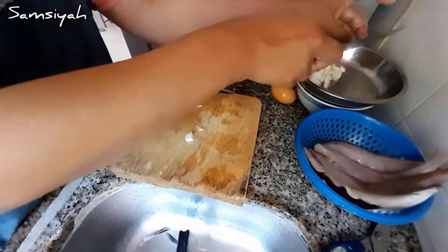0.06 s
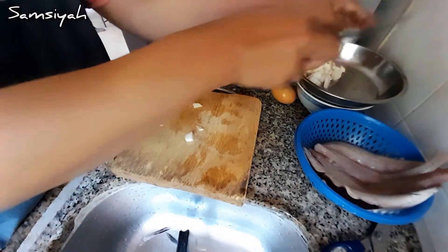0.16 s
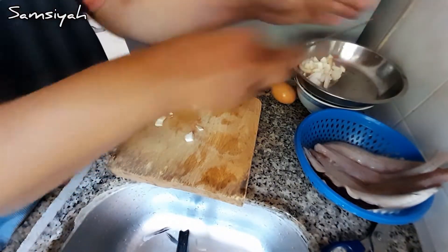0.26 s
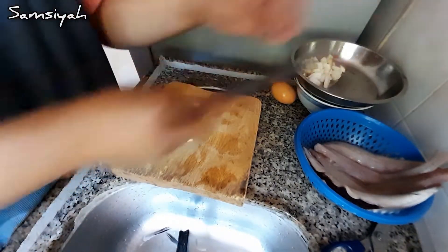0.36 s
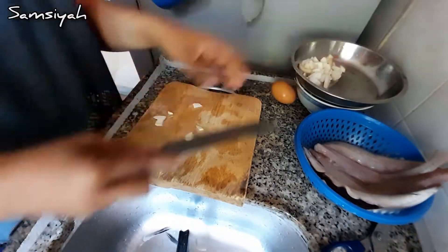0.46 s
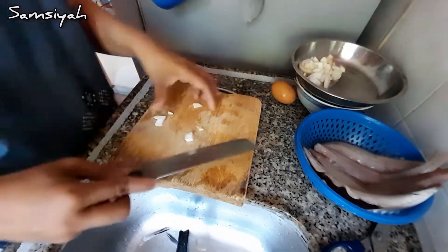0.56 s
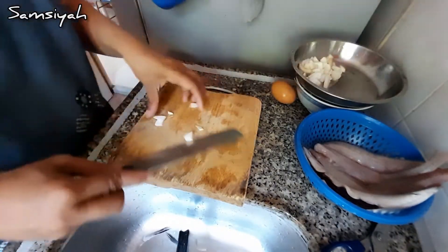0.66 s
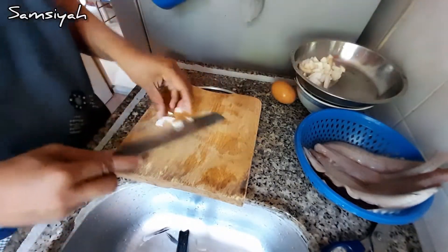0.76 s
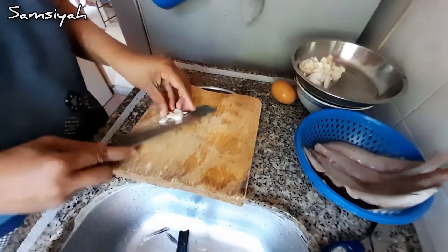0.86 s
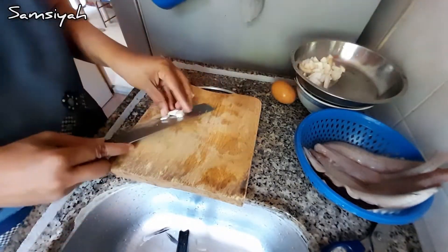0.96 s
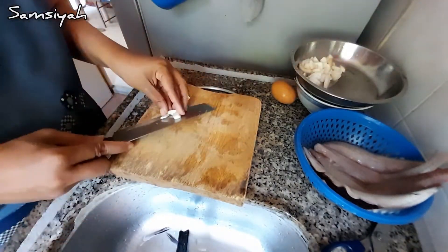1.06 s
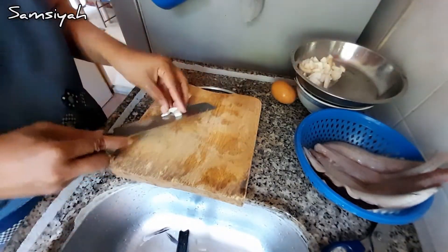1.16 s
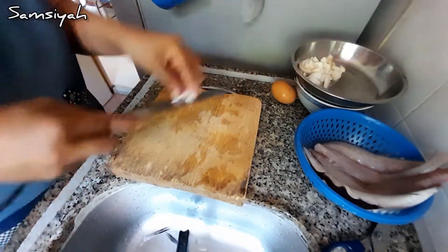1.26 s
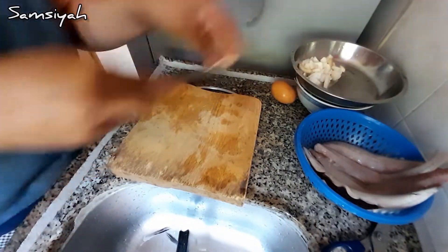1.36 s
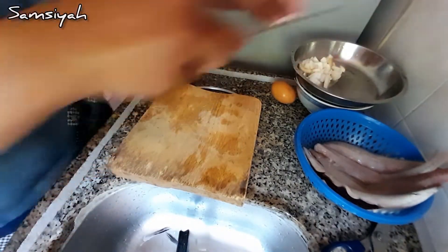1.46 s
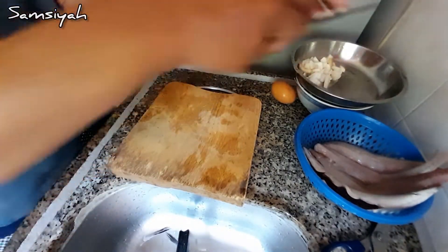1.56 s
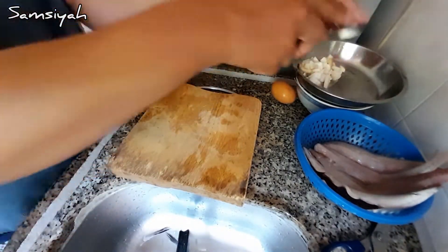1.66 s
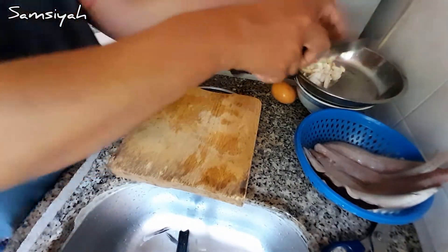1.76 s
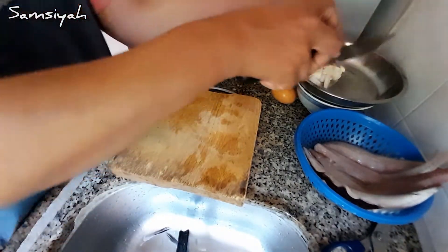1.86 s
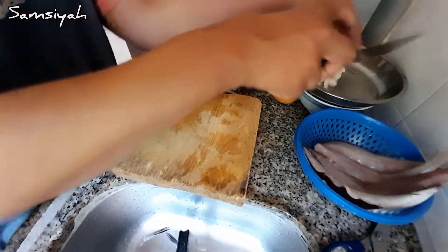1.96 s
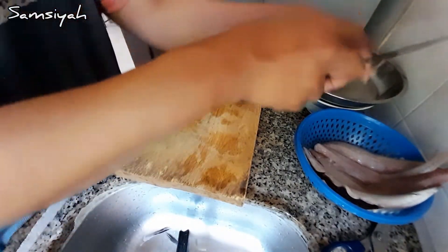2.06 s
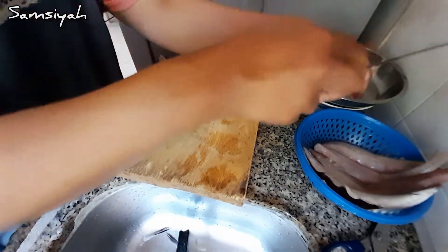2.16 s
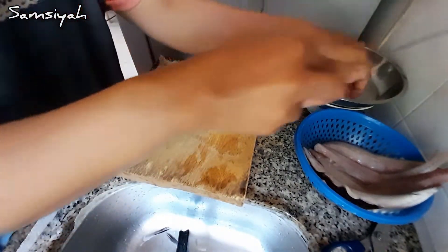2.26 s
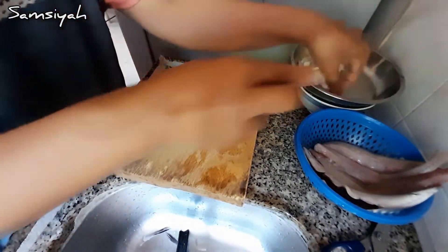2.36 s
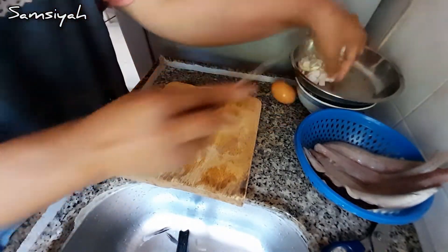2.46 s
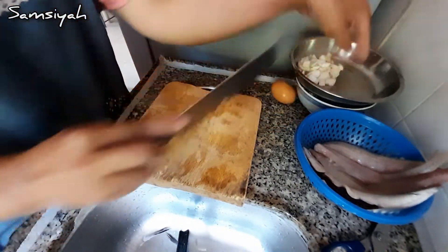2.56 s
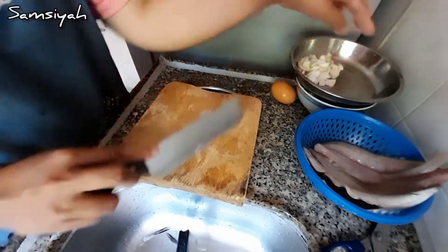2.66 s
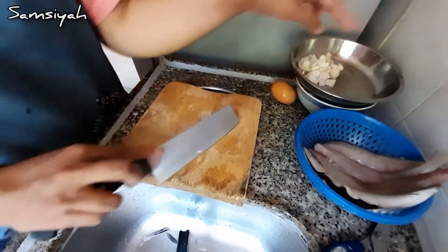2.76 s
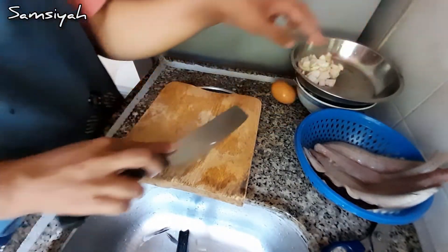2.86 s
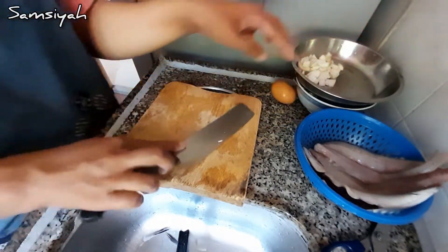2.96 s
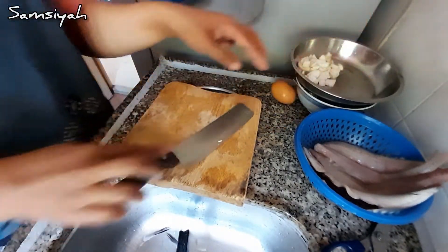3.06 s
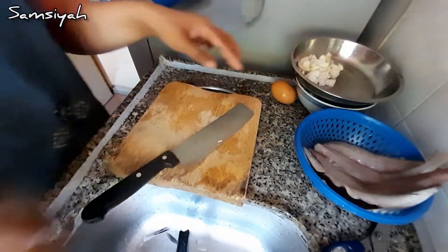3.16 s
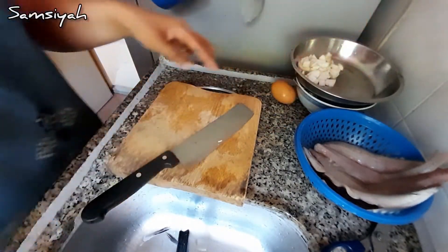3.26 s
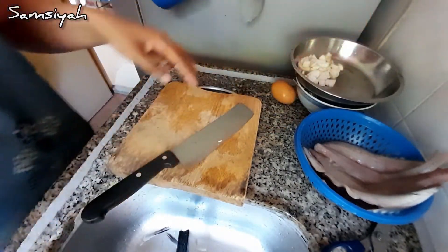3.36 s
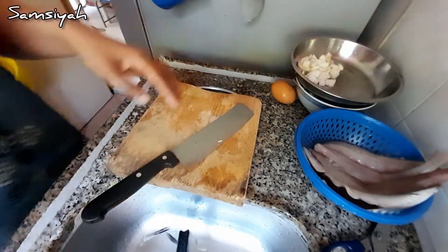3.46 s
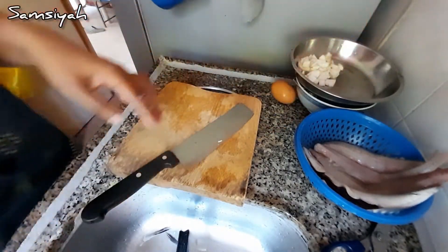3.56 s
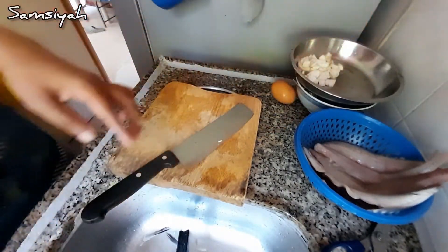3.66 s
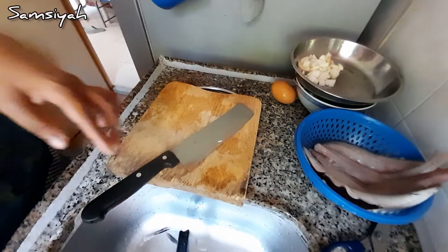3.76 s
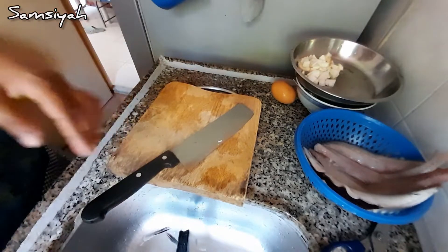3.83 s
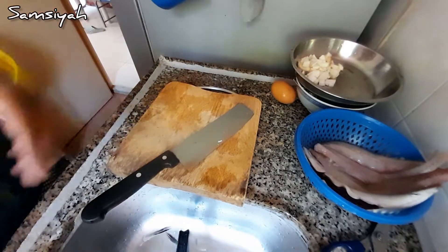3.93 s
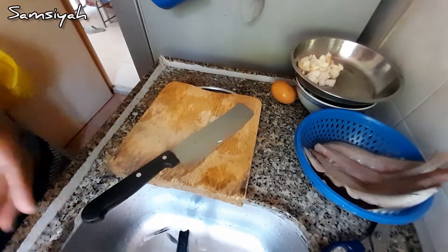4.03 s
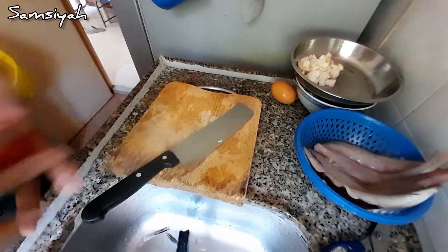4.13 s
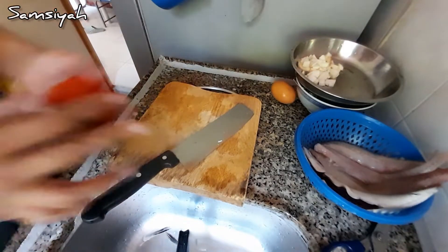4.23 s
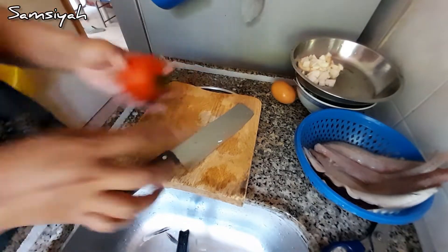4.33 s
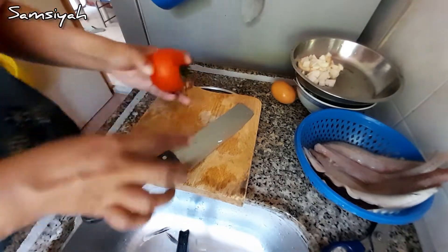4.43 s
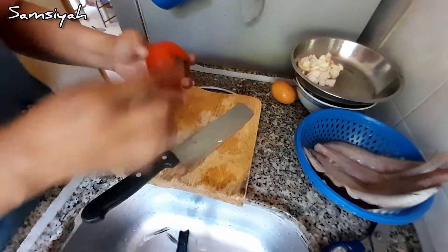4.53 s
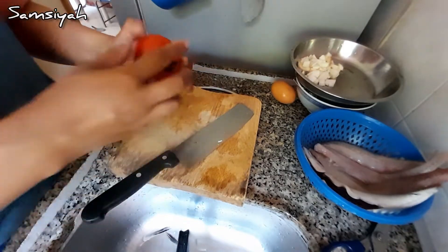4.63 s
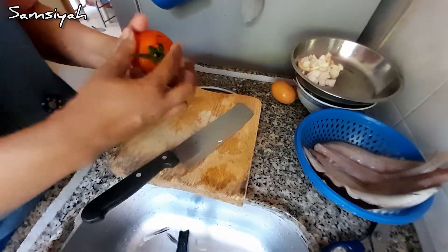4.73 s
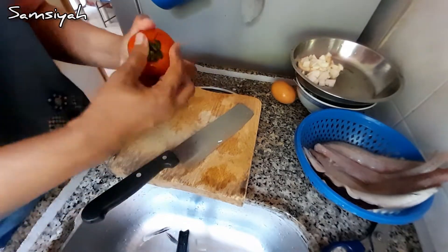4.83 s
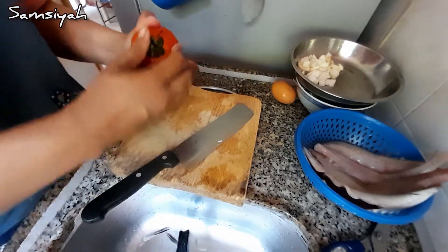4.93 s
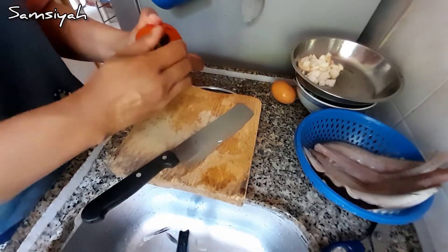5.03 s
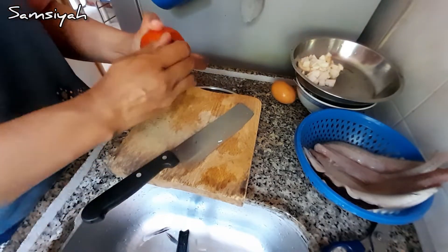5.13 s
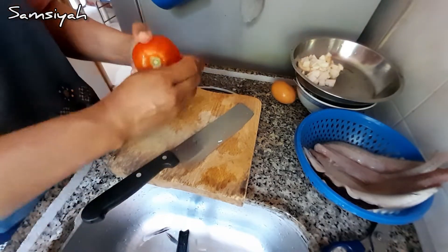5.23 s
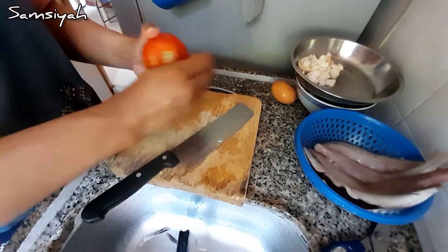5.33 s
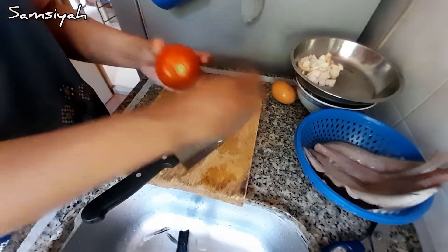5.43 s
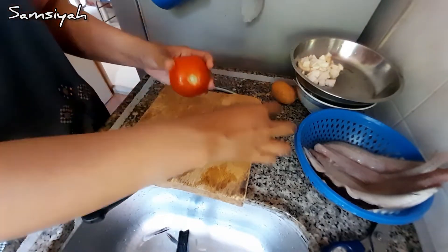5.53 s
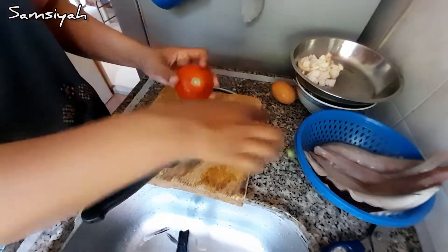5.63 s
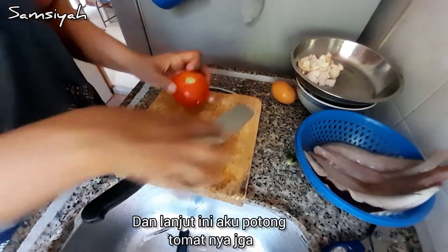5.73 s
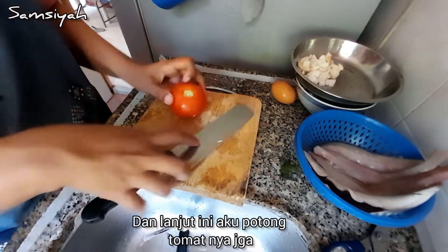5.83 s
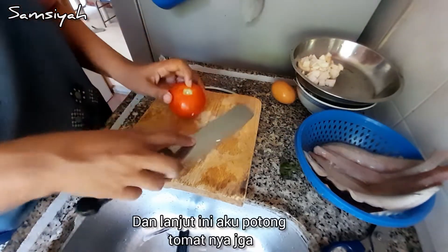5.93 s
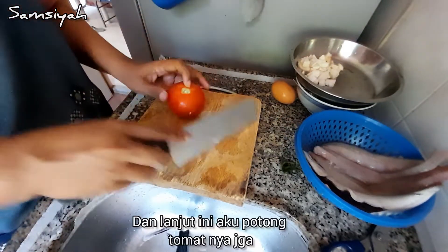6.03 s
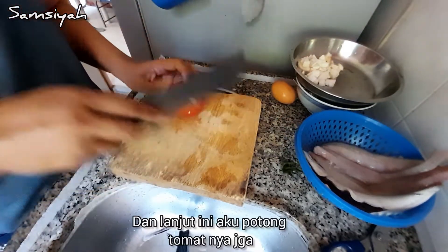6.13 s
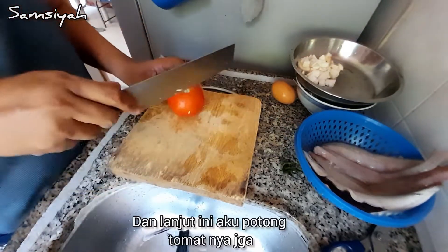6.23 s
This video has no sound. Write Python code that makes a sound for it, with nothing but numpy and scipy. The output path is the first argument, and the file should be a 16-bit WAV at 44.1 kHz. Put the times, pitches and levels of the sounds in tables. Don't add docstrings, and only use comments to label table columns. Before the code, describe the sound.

Close in a small, hard-walled kitchen, a knife edge taps a wooden board and scrapes thinly across it. Sleeves and hands rustle with dull bowl bumps. A loud flat knock shakes the counter, then the blade is laid down with a metallic clatter. Quieter handling follows, a crisp stalk snap, small ticks and soft thuds, with faint bird whistles and a low motor hum at the end.

```python
import sys
import numpy as np
from scipy import signal
from scipy.fft import rfft, irfft, next_fast_len
from scipy.io import wavfile
from scipy.ndimage import uniform_filter1d, map_coordinates

SR = 44100
rng = np.random.default_rng(int(sys.argv[2]) if len(sys.argv) > 2 else 0)


def ratio(d):
    e = np.asarray(d, float) / 20
    return 10 ** e


def dump_mix(stems):
    frames = np.atleast_2d(stems).T
    limited = np.clip(frames, -1, 1)
    pcm = np.round(limited * 32767).astype(np.int16)
    wavfile.write(sys.argv[1], SR, pcm)


N = 277389
TIME = np.arange(N) / SR


def rms_one(x):
    return x / np.sqrt(np.mean(x ** 2) + 1e-20)


def in_time(rows):
    s, *columns = np.transpose(rows)
    return [np.interp(TIME, s, c) for c in columns]


def at_hz(points, hz):
    points = np.array(points)
    return np.interp(np.log(hz), np.log(points[:, 0]), points[:, 1])


def drift(rate):
    r = np.exp(-80 * np.pi * rate / SR)
    chance = rng.standard_normal(N // 40 + 2002)
    slow = signal.lfilter([1], [1, -2 * r, r * r], chance)[2000:]
    return np.interp(np.arange(N) / 40, np.arange(len(slow)), rms_one(slow))


def pan(db):
    return ratio(np.array([db / 2, -db / 2])).reshape(2, -1)


def dull(x, hz):
    return signal.sosfilt(signal.butter(2, min(hz, .45 * SR), fs=SR, output="sos"), x)


def above(x, hz, order=2):
    return signal.sosfilt(signal.butter(order, hz, "high", fs=SR, output="sos"), x)


def between(x, low_hz, high_hz):
    return signal.sosfilt(signal.butter(2, [low_hz, high_hz], "band", fs=SR, output="sos"), x)


def resonate(x, hz, width_hz):
    r = np.exp(-np.pi * width_hz / SR)
    feedback = [1, -2 * r * np.cos(2 * np.pi * hz / SR), r * r]
    return signal.lfilter([(1 - r * r) / 2, 0, (r * r - 1) / 2], feedback, x)


def blend(mid, side, alike):
    alike = np.clip(alike, -1, 1)
    return np.sqrt(1 + alike) * mid + np.sqrt(1 - alike) * side * [[1], [-1]]


def stereo_noise(alike):
    mid, side = rng.standard_normal((2, N))
    return blend(mid, side, alike) / np.sqrt(2)


# (frequency [Hz], left-right likeness [-1..1])
LIKENESS = [(60, 0.91), (180, 0.8), (550, 0.24), (1650, -0.15), (4970, -0.024), (15000, -0.65)]


def banded_noise(spectrum, low_hz, patchy_db, alike=None):
    out, edges = 0, low_hz * 2 ** np.arange(0, np.log2(.38 * SR / low_hz), 1 / 3)
    white = rng.standard_normal((2, 2, N))
    for k, (low, high) in enumerate(zip(edges, edges[1:])):
        mid, side = between(white[k % 2], low, high)
        hz = np.sqrt(low * high)
        like = at_hz(LIKENESS, hz) if alike is None else alike
        gain = ratio(at_hz(spectrum, hz) + patchy_db * drift(17.0))
        out = out + gain * blend(mid, side, like)
    return rms_one(out)


def swells(rows, roundness, rest_db):
    power = ratio(np.array(rest_db))[:, None] ** 2 + 0 * TIME
    for s, rise, fall, *peak_db in rows:
        away = np.where(TIME < s, (s - TIME) / rise, (TIME - s) / fall)
        power = power + ratio(np.array(peak_db)[:, None] - 20 * np.minimum(away, 10) ** roundness) ** 2
    return 10 * np.log10(power)


def ring(modes, length):
    hz, level_db, t60 = np.array(modes).T[:, :, None]
    t = np.arange(round(length * SR)) / SR
    luck = rng.normal(0, 1, (3, len(modes), 1))
    wide = np.minimum(hz / 2500, 1)
    turn = np.pi * (np.arange(len(modes)) % 2)[:, None] * (hz < 600)
    beat = 1 + .2 * wide * np.sin(2 * np.pi * hz * .012 * luck[1] * t + luck[2])
    ears = []
    for ear in range(2):
        decay = ratio(level_db + 0.95 * wide * luck[ear] - 60 * t / t60)
        phase = 2 * np.pi * hz * t + turn + ear * wide * (1.95 + 1.28 * luck[0])
        ears.append(np.sum(decay * beat * np.sin(phase), axis=0))
    return np.array(ears)


def burst(at_s, hz, width_hz, t60, alike):
    t = np.arange(round(.25 * SR)) / SR
    mid, side = rng.standard_normal((2, len(t)))
    noise = resonate(blend(mid, side, alike), hz, width_hz)
    return round(at_s * SR), rms_one(noise) / 2 * ratio(-60 * t / t60) * np.minimum(t / .0005, 1)


def add(out, start, piece):
    out[:, start:start + piece.shape[-1]] += piece[..., :N - start]


# (time [s], lower mode level [dB], lean toward upper mode [dB])
TRAFFIC = [(0, -54.5, -1), (.15, -56.5, 1), (.5, -59, 9.5), (.9, -56.5, 5), (1.1, -60, 2.5),
           (1.4, -57.5, 3.5), (1.8, -51, -2), (2.2, -56.5, 4), (2.5, -51.5, -5), (3.3, -56, 0.5),
           (3.55, -57.5, -3.5), (4.1, -54, 0.5), (4.6, -50.5, -9), (4.95, -50, 1.5), (5.25, -63, 4),
           (5.5, -54, 1), (6.29, -56.5, 6)]
# (frequency [Hz], width [Hz])
DRONE_MODES = [
    (113, 13),
    (153, 14.8),
]
# (frequency [Hz], level per Hz [dB])
AIR = [(190, -7), (344, -13), (430, -8), (919, -13.5), (3630, -22.5), (7340, -34), (10800, -38.5),
       (16000, -54.5)]


def room_air():
    air_db, murmur_rest_db, rumble_db = -53.5, -55.5, -67.5
    handling_db, linger_s = -0.5, 0.066
    lower_db, lean_db = in_time(TRAFFIC)
    lower_db = lower_db - 1.5
    upper_db = lower_db + lean_db
    handling = uniform_filter1d(ratio(effort()[1] + handling_db) ** 2, round(linger_s * SR))
    murmur_db = 10 * np.log10(ratio(murmur_rest_db) ** 2 + handling)
    air = banded_noise(AIR, low_hz=187.5, patchy_db=1.0)
    murmur = dull(air, hz=1300)
    out = ratio(air_db) * (air - murmur) + ratio(murmur_db - 0.9) * rms_one(murmur)
    for (hz, width_hz), level_db in zip(DRONE_MODES, (lower_db, upper_db)):
        once = resonate(stereo_noise(1.0), hz, width_hz * 1.38)
        twice = resonate(once, hz, width_hz * 1.38)
        out += ratio(level_db + 5.5) * rms_one(twice) * pan(-1.06)
    rumble = rms_one(between(stereo_noise(0.88), 36, 72))
    return out + ratio(rumble_db + 0.7 * (murmur_db - murmur_rest_db) + 1.3 * drift(1.0)) * rumble


# (peak time [s], rise [s], fall [s], bright level [dB], dull level [dB])
GESTURES = [(0.234, 0.19, 0.87, -59, -58.5), (0.575, 0.082, 0.45, -73, -50.5), (0.74, .17, 0.12, -43, -41),
            (0.885, 0.17, 0.048, -45.5, -46.5), (1.537, 0.15, 0.23, -51, -50),
            (1.836, 0.17, 0.16, -54, -52.5), (2.04, .15, 0.39, -66, -66), (2.205, 0.022, 0.074, -70, -50),
            (2.375, 0.19, 0.12, -50.5, -53.5), (2.645, 0.21, 0.069, -48.5, -51),
            (2.839, 0.27, 0.23, -47.5, -49.5), (3.03, 0.03, 0.12, -43.5, -39.5),
            (3.133, 0.2, 0.22, -52, -52), (3.906, .1, 0.11, -67.5, -64), (4.15, 0.092, 0.19, -50.5, -52),
            (4.615, 0.13, 0.39, -73.5, -66), (4.789, 0.079, 0.43, -68, -61), (5.054, 0.079, 0.11, -57, -70),
            (5.2, 0.047, 0.074, -47, -51.5), (5.348, .04, 0.52, -63.5, -80),
            (5.58, 0.31, 0.32, -66.5, -57.5), (5.795, 0.11, 0.14, -64, -56.5),
            (5.872, 0.11, 0.46, -63, -55), (5.996, 0.055, 0.037, -48.5, -54.5),
            (6.201, 0.15, 0.25, -69, -61)]


def effort():
    return swells(GESTURES, roundness=1.19, rest_db=[-74.5, -74.5])


# (frequency [Hz], level per Hz [dB])
RUSTLE = [(2650, -29), (4500, 4), (5530, -15), (6920, -10), (8550, 8), (10200, -2), (14000, -3.5),
          (16000, -12)]


def hands():
    bright_db, body_db = effort()
    grain = ratio(1.47 * drift(120) + 0.33 * drift(9.5))
    bright = banded_noise(RUSTLE, low_hz=4500, patchy_db=2.2, alike=.1) * pan(-1)
    body = rms_one(between(stereo_noise(0.045), 1400, 6200))
    return grain * (ratio(bright_db + 1.0) * bright + ratio(body_db + 0.5) * body)


# (time [s], frequency [Hz], level [dB], rise [s], decay t60
# [s])
BUMPS = [(0.33, 461, -49, 0.047, 0.26), (0.74, 457, -36, 0.007, 0.047), (1.219, 452, -50.5, 0.022, 0.2),
         (1.84, 820, -42.5, 0.037, 0.12), (2.195, 814, -51, 0.004, 0.12), (2.195, 1000, -57, .004, 0.055),
         (2.2, 607, -55.5, 0.0044, 0.21), (2.33, 489, -48.5, 0.032, 0.15), (2.33, 1123, -53, 0.047, 0.37),
         (2.38, 1980, -54, 0.019, 0.11), (4.903, 1070, -41, 0.0031, 0.08), (4.901, 375, -52, 0.0026, 0.064),
         (5.159, 3990, -26, 0.0023, 0.025), (5.16, 520, -40, 0.00092, 0.015),
         (5.162, 1880, -45.5, 0.002, 0.04), (5.825, 48.6, -39.5, 0.013, 0.44),
         (5.824, 98, -35, 0.017, 0.17), (2.72, 56.3, -34, 0.021, 0.16), (3.0, 56, -38, 0.016, 0.14),
         (2.6975, 225, -15, .0007, .035), (2.696, 105, -30, 0.0034, .15), (0.563, 290, -38, 0.0027, 0.047)]


def bumps():
    roughness, blur = .8, .05
    out, t = np.zeros((2, N)), np.arange(round(.6 * SR)) / SR
    for s, hz, level_db, rise, t60 in BUMPS:
        touch = dull(rng.standard_normal((2, len(t))), blur * hz)
        uneven = rms_one(touch) * roughness * (300 < hz < 3000)
        phase = 2 * np.pi * hz * t
        wave = (1 + uneven[0]) * np.sin(phase) + uneven[1] * np.cos(phase)
        add(out, round(s * SR), ratio(level_db - 60 * t / t60) * (1 - np.exp(-t / rise)) * 2 * wave)
    return out


EDGE = [(886, -1.5, 0.043), (780, -7, 0.032), (1640, -8, 0.05), (2087, -4, 0.043), (2206, -0.5, 0.062),
        (2500, 1, 0.028), (2776, -1, 0.078), (3580, -11, 0.028), (4220, -1.5, 0.058), (4800, -11, 0.06),
        (5100, -8.5, 0.04), (5400, -6, 0.035), (5900, -10, .03), (6500, -1, 0.024)]
FLAT = [(640, 13, 0.016), (826, -5, 0.07), (1068, 5, 0.046), (1123, -0.5, 0.11), (1351, -4, .08),
        (1444, 1, 0.057), (1697, 0, 0.12), (1980, -12, 0.07), (2632, -11, 0.07), (3040, -5, .03),
        (3112, -10, 0.05), (3661, -6, 0.036), (3860, -8, .06), (4482, -9, 0.07)]
BLADE = [(1064, -9, 0.035), (1463, -12.5, 0.082), (2390, -11, .06), (3537, -7.5, 0.05), (4220, -9, 0.11),
         (4490, -6, 0.6), (5233, -1.5, 0.11), (5430, -8, .08), (5950, -7, 0.09), (7000, 0, 0.065),
         (7700, -3, 0.1), (8900, -4, 0.087), (11600, -10, 0.07), (12800, -3, 0.08)]
RATTLE = [(695, -4, 0.029), (1052, -5, 0.063), (2600, -21, 0.046), (3530, 2, 0.033), (4070, 10, 0.032),
          (4240, -3, 0.24), (4500, -5, 0.13), (4450, 1, 0.051), (5600, -13, 0.1), (5890, 2, 0.039),
          (5270, -4, 0.1), (5900, -14, .15), (12270, -26, .04)]
SETTLE = [(1010, -9.5, 0.06), (3445, -5, 0.08), (3607, -7, 0.12), (4280, -1, .28), (4180, -8, 0.2),
          (4500, -15, 0.3), (4560, -14, 0.22), (5238, -12, 0.25), (5340, -3, 0.05), (5940, 6, .025),
          (5722, 0, 0.06), (5900, -8, .12), (6400, -4, .025), (3914, -14, 0.2)]
# (time [s], crack level [dB], knock level [dB], ring level [dB], knock frequency [Hz])
BLOWS = [
    (0.562, -18, -23, -22, 2200),
    (2.695, -8, -16, -23.5, 1300),
    (2.9843, -10, -15, -13, 5900),
    (3.0329, -16.5, -24, -23, 4200),
    (3.092, -29, -27, -25, 5600),
    (3.179, -41, -42, -73, 13700),
]


def knife():
    out, t = np.zeros((2, N)), np.arange(round(.3 * SR)) / SR
    bodies = EDGE, FLAT, BLADE, RATTLE, SETTLE, SETTLE
    stops = [row[0] for row in BLOWS[1:]] + [N / SR]
    sides_db = [0.1, 0.1, 2.5] + [3.5] * len(BLOWS)
    for (s, crack_db, knock_db, ring_db, knock_hz), modes, stop, side_db in zip(BLOWS, bodies, stops, sides_db):
        held = ratio(-np.maximum(s + t - stop, 0) * 2000) * np.minimum(t / 0.00083, 1)
        start, crack = burst(s, hz=6650, width_hz=13000, t60=0.026, alike=-0.15)
        start, tail = burst(s, hz=7000, width_hz=12000, t60=0.25, alike=0.096)
        start, knock = burst(s, knock_hz, width_hz=knock_hz * .8, t60=.07, alike=.3)
        crack = dull(crack + ratio(-19.5) * tail, hz=12000)
        add(out, start, (ratio(crack_db) * crack + ratio(knock_db) * knock) * pan(side_db))
        add(out, start, ratio(ring_db - 4) * held * ring(modes, length=.3) * pan(side_db))
    return out


# (time [s], peak level [dB], frequency [Hz], length [s], left-right [dB])
SPIKES = [
    (2.985, -6, 5400, .00022, 9),
    (2.9866, -14, 6200, .0004, 3),
    (3.0332, -17, 5000, .0002, 4),
    (0.5628, -21, 2400, .0004, 0),
    (2.6985, -17, 1500, .0005, 0),
]


def spikes():
    out, t = np.zeros((2, N)), np.arange(-80, 81) / SR
    for s, peak_db, hz, length, side_db in SPIKES:
        packet = np.cos(2 * np.pi * hz * t) * np.exp(-(t / length) ** 2)
        add(out, round(s * SR) - 80, -ratio(peak_db) * packet * pan(side_db))
    return out


# (time [s], level [dB], centre frequency [Hz], decay t60 [s])
SHUDDERS = [(0.567, -42, 320, .15), (2.697, -23.5, 300, 0.16), (2.698, -26, 1170, 0.14),
            (2.73, -27, 390, 0.12), (2.99, -32, 7200, .3), (3.04, -33, 790, 0.12), (3.035, -31, 5100, 0.23),
            (3.095, -44, 5300, 0.2), (0.563, -31, 5500, 0.057), (5.163, -46, 5900, 0.12),
            (5.786, -38, 520, 0.12), (5.82, -46, 680, 0.18), (5.885, -42.5, 680, 0.33), (2.2, -44, 540, .3),
            (2.987, -32.5, 330, 0.32), (2.99, -36, 650, .25), (2.988, -35, 1600, .2),
            (2.697, -34, 2800, 0.092), (2.988, -34, 9000, .3)]


def shudders():
    out = np.zeros((2, N))
    for s, level_db, hz, t60 in SHUDDERS:
        start, noise = burst(s, hz, width_hz=hz * 0.5, t60=t60, alike=0.23)
        add(out, start, ratio(level_db) * dull(noise, hz * 2) * pan(1.5))
    return out


def shaded(x):
    share = .45
    return x + above(x, 9500, order=1) * [[-share], [share / 2]]


# (frequency [Hz], level [dB], decay t60 [s])
COUNTER = [(111.3, -2.5, 0.47), (155, 5, 0.26), (178, -11.5, 0.87), (201.8, -11, 0.39), (233, -4.5, 0.41),
           (257, 7.5, 0.061), (326, -11, 0.24), (379, 2, 0.035), (449, -17, 0.43), (525, -32, 0.14)]
# (time [s], lowest mode [dB], middle modes [dB], upper modes [dB], share of free ring time [1])
THUDS = [(0.564, -26.5, -31, -29.5, 0.7), (0.628, -28, -53, -37, 0.24), (2.698, -20, -14, -17.5, 0.78),
         (2.724, -40, -45, -45, .5), (2.733, -17, -22, -28, .8), (2.756, -27, -27.5, -29.5, 1.07),
         (2.985, -24, -17.5, -36, 1.26), (3.034, -51, -18.5, -25, 0.47), (3.103, -24.5, -26, -33, 0.5),
         (5.62, -42, -44, -32, 0.92), (5.752, -63, -33, -37.5, 0.75), (5.823, -47, -27.5, -35.5, 0.78),
         (5.898, -45, -48, -33, 0.64), (5.942, -32, -36, -30.5, 0.3)]


def counter():
    rise_s, hard_db = 0.019, -20.5
    out, t = np.zeros((2, N)), np.arange(round(.6 * SR)) / SR
    stops = [row[0] for row in THUDS[1:]] + [N / SR]
    for (s, low_db, mid_db, high_db, free), stop in zip(THUDS, stops):
        rise = rise_s * free / (1 + ratio(high_db - hard_db) ** 2)
        slow = 1 - np.exp(-t / (rise_s * free))
        quick = 1 - np.exp(-t / rise)
        shares = [low_db, mid_db, mid_db] + [high_db] * (len(COUNTER) - 3)
        modes = [(hz, level_db + share, t60 * free) for (hz, level_db, t60), share in zip(COUNTER, shares)]
        held = ratio(-np.maximum(s + t - stop, 0) * 1100)
        deep = slow * ring(modes[:3], length=.6) * pan(-1.)
        upper = quick * ring(modes[3:], length=.6) * pan(1.5)
        add(out, round(s * SR), held * (deep + upper))
    return above(out, 85)


# (peak time [s], rise [s], fall [s], level [dB])
SCRAPE = [
    (0.645, 0.05, .08, -42),
    (0.705, 0.04, 0.1, -32),
    (0.748, .09, .05, -31),
    (0.82, 0.13, 0.11, -36),
    (.885, .1, .04, -44),
    (2.365, 0.05, 0.051, -44.5),
    (2.81, 0.038, 0.013, -47),
    (2.838, .02, 0.046, -46),
    (6.0, 0.03, 0.019, -55),
]
# (frequency [Hz], width [Hz], level [dB])
BLADE_SING = [(2740, 150, -8), (4320, 80, -13), (4530, 72, -12), (6260, 100, -10), (7730, 190, -13),
              (9330, 100, -4), (10520, 130, -3), (10960, 70, -0.5), (11600, 140, -3), (12600, 80, -0.5),
              (13200, 90, -2), (14000, 200, -7), (14700, 120, -1), (15500, 130, -6)]


def scrape():
    level_db, = swells(SCRAPE, roundness=1.12, rest_db=[-95])
    jolts = stereo_noise(.3) * ratio(2.2 * np.minimum(rng.exponential(1, N), 5))
    sing = 0
    for hz, width_hz, db in BLADE_SING:
        sing = sing + ratio(db + 5.5 * drift(14)) * rms_one(resonate(jolts, hz, width_hz))
    bent = np.arange(N) + .006 * np.cumsum(drift(5))
    bent = bent - np.interp(.7, TIME, bent) + .7 * SR
    sing = np.array([map_coordinates(ear, [bent], order=5, mode="mirror") for ear in sing])
    hiss = above(jolts, 9000)
    body = resonate(jolts, hz=1900, width_hz=1700)
    layers = rms_one(sing) + ratio(-7) * rms_one(hiss) + ratio(-12) * rms_one(body)
    return ratio(level_db - 3.5 + 2.0 * drift(25)) * layers * pan(-3.5)


# (time [s], peak level [dB], centre frequency [Hz], decay t60 [s], left-right [dB])
TICKS = [(0.6984, -27, 10800, 0.3, 1), (2.195, -39, 9660, 0.18, -7), (2.2115, -32, 3650, 0.022, 3),
         (2.9826, -16, 2500, 0.02, -1), (4.0655, -43, 3950, 0.034, 6.5), (4.109, -44, 10200, 0.57, 14),
         (4.78, -23.5, 9940, 0.017, 2), (5.042, -40, 9670, 0.04, -1), (5.1593, -13, 10400, 0.044, -1),
         (5.1684, -39, 3860, 0.024, 6), (5.3365, -46, 4050, 0.043, 1), (5.5339, -55, 3330, 0.046, 3),
         (5.576, -43, 3610, 0.026, -8), (5.6217, -25, 4500, 0.025, -2), (5.7854, -29, 4300, 0.048, 2),
         (5.798, -40, 2680, 0.05, -3), (5.886, -51, 2600, 0.044, -9), (5.899, -42.5, 2500, 0.14, 5)]


def ticks():
    out = np.zeros((2, N))
    for s, peak_db, hz, t60, side_db in TICKS:
        broad_hz, broad_db = (9800, -2.5) if hz < 6000 else (4200, -6.5)
        start, core = burst(s, hz, width_hz=hz * .6, t60=t60, alike=0.14)
        start, broad = burst(s, hz=broad_hz, width_hz=6500, t60=t60 * 1.3, alike=.3)
        snap = dull(core + ratio(broad_db) * broad, hz=11800)
        add(out, start, ratio(peak_db - 4.5) * snap * pan(side_db))
    return out


# (start time [s], length [s], start frequency [Hz], end frequency [Hz], level [dB])
BIRDS = [(3.995, .18, 460, 452, -52.5), (5.765, .02, 3000, 2850, -57), (5.735, .04, 2450, 2300, -64),
         (5.785, .03, 2700, 2620, -56), (5.81, .04, 2750, 2400, -60), (5.845, .025, 2650, 2700, -63),
         (5.86, .025, 2150, 2000, -62), (5.885, .03, 2000, 2250, -57), (5.915, .045, 2250, 2150, -59),
         (6.205, .035, 455, 450, -58), (6.245, .045, 460, 450, -59), (6.215, .03, 2200, 2500, -58),
         (6.225, .03, 2700, 2600, -56), (6.235, .055, 2500, 2350, -58), (6.245, .03, 3050, 2950, -49),
         (6.27, .03, 2740, 2800, -46), (6.275, .02, 2950, 3000, -51)]


def birds():
    out, hoarse = np.zeros((2, N)), .45 + .8 * drift(90)
    for s, length, start_hz, end_hz, level_db in BIRDS:
        u = np.linspace(0, 1, round(length * SR))
        phase = 2 * np.pi * np.cumsum(start_hz + (end_hz - start_hz) * u) / SR
        rough = 1 + (hoarse[round(s * SR):][:len(u)] - 1) * (start_hz > 1000)
        whistle = (np.sin(np.pi * u) ** .5 * np.sin(phase))[:len(rough)]
        add(out, round(s * SR), ratio(level_db) * np.sqrt(2) * rough * whistle)
    return out


# (time [s], frequency [Hz], level [dB])
HUM = [
    (5.81, 155, -67),
    (5.85, 155, -47),
    (5.93, 152.9, -34.5),
    (5.955, 155.6, -54),
    (6.0, 151, -36),
    (6.06, 150, -41.5),
    (6.2, 151, -39.5),
    (6.29, 147, -38.5),
]


def motor():
    hz, level_db = in_time(HUM)
    return ratio(level_db) * np.sqrt(2) * np.sin(2 * np.pi * np.cumsum(hz) / SR) * pan(-1.0)


def kitchen(x):
    t60_s, wall_cut_hz = 0.23, 10400
    size = next_fast_len(N + SR)
    w = np.linspace(0, np.pi, size // 2 + 1)
    wall = 1 / (1 + 1j * w * SR / (2 * np.pi * wall_cut_hz))
    lags = rng.uniform(.006, .028, 16) * SR
    loops = [ratio(-60 * lag / SR / t60_s) * wall * np.exp(-1j * w * lag) for lag in lags]
    tails = [sum((-1) ** k * g / (1 - g) for k, g in enumerate(loops[ear::2])) for ear in range(2)]
    return irfft(rfft(x.mean(axis=0), size) * np.array(tails), size)[:, :N]


def scene():
    soft = bumps()
    struck = shaded(knife() + shudders()) + spikes() + ticks() + birds()
    echo = above(kitchen(struck + .3 * soft), 250)
    direct = struck + soft + counter() + hands() + scrape() + room_air() + motor()
    return direct + ratio(-13.0) * echo


def roll_off(x):
    return signal.sosfilt(signal.butter(12, 17000, fs=SR, output="sos"), x)


# (frequency [Hz], width [Hz], added share [1])
PORTS = [
    (6850, 6500, -0.6),
    (8570, 420, -0.42),
    (9720, 640, 0.47),
]


def record(dry):
    for hz, width_hz, share in PORTS:
        dry = dry + share * resonate(dry, hz, width_hz)
    mix = signal.sosfilt(signal.cheby2(14, 45, 16250, fs=SR, output="sos"), dry)
    return roll_off(mix)


dry = scene()
out = record(dry)
dump_mix(out)
```